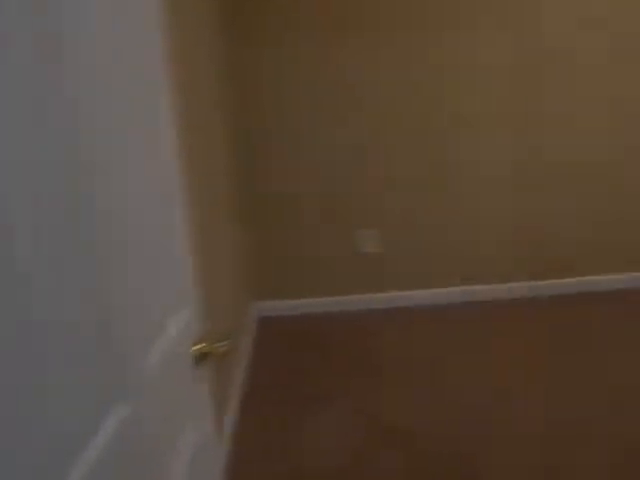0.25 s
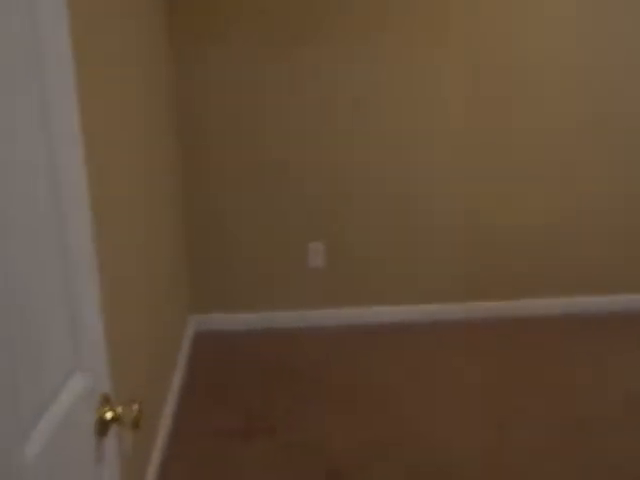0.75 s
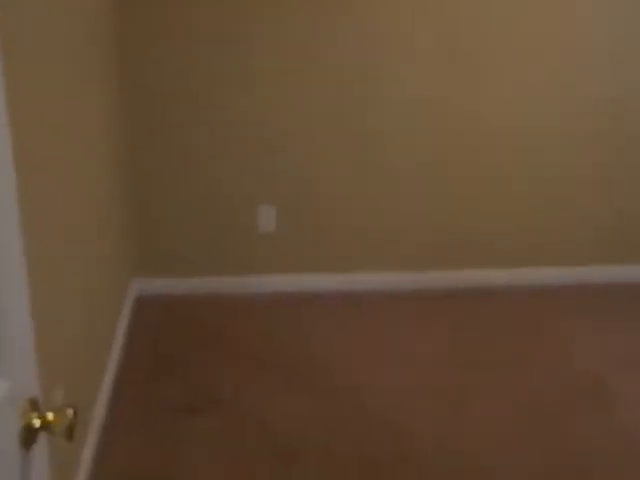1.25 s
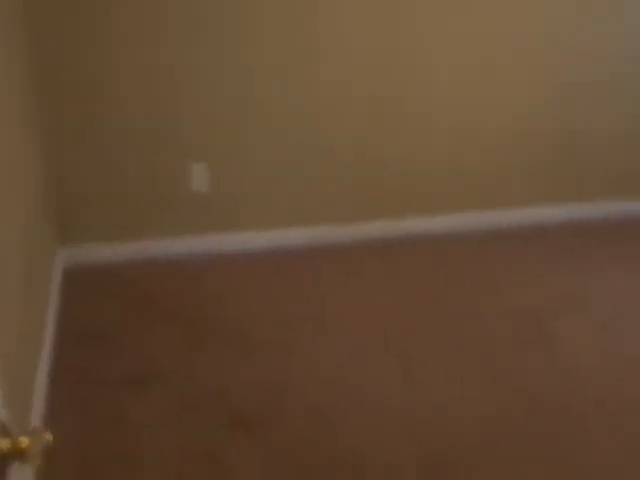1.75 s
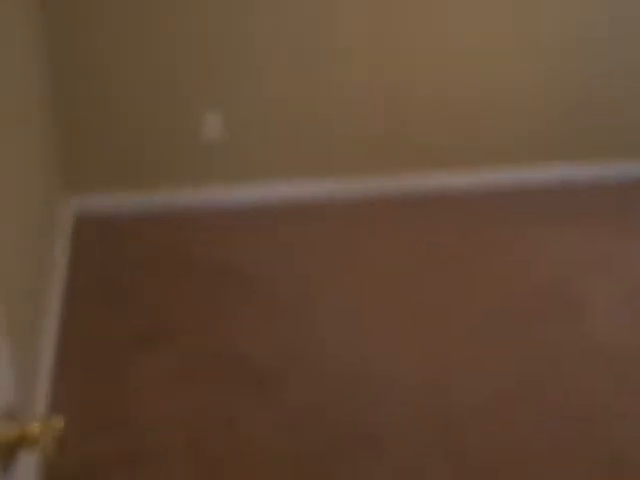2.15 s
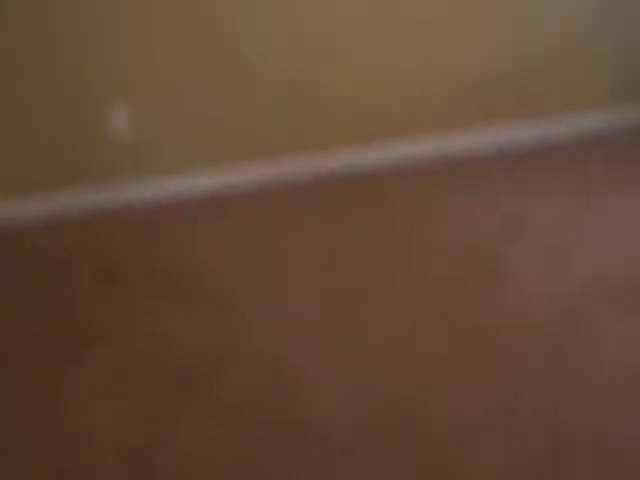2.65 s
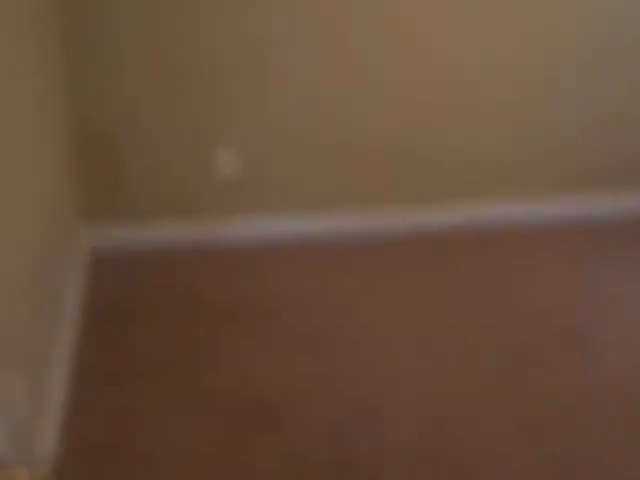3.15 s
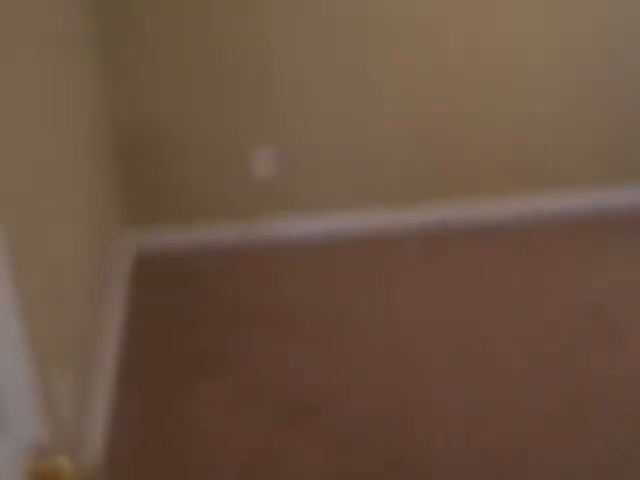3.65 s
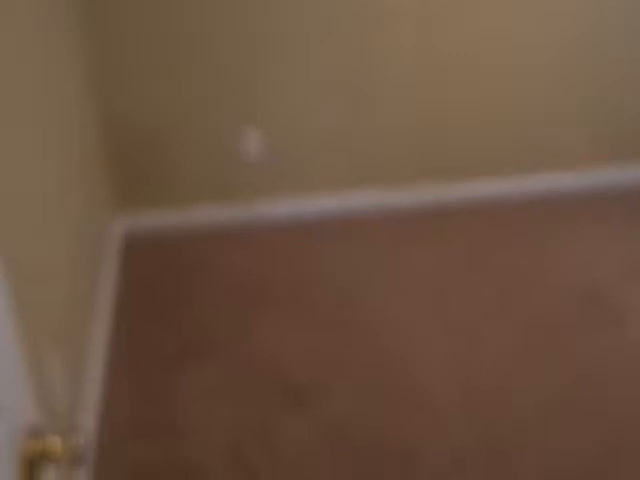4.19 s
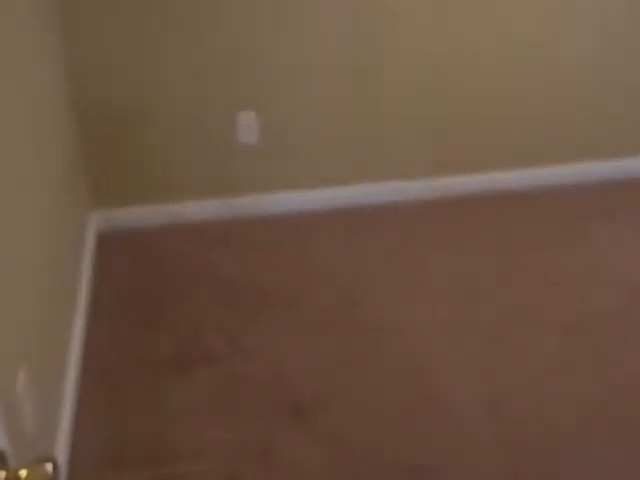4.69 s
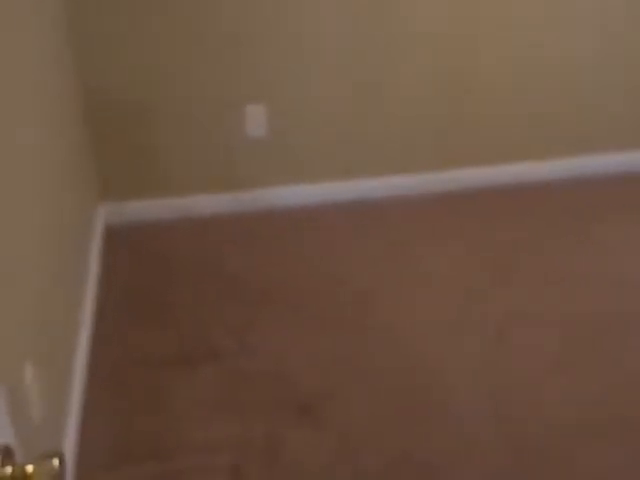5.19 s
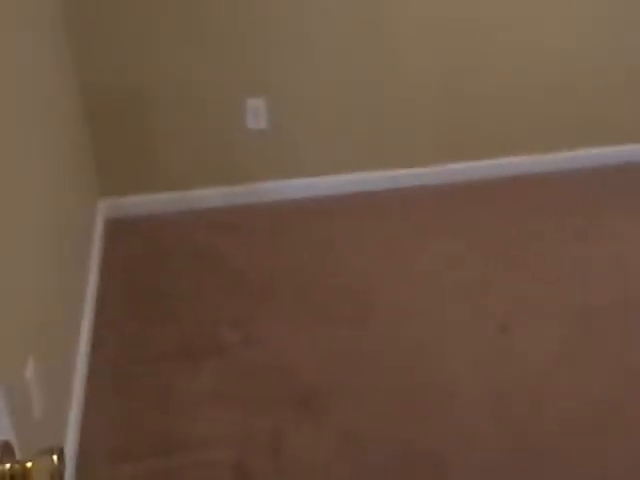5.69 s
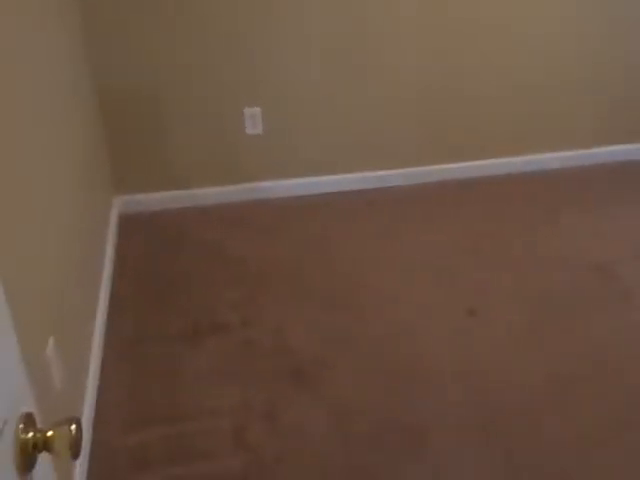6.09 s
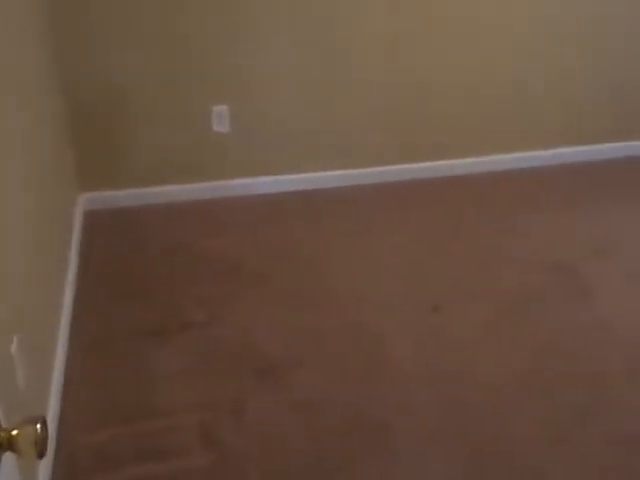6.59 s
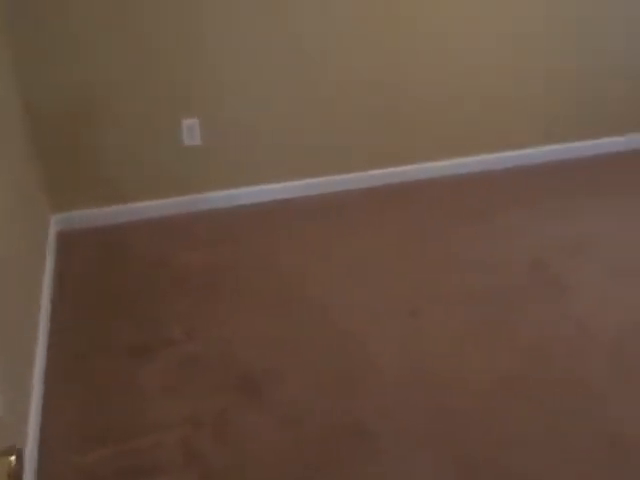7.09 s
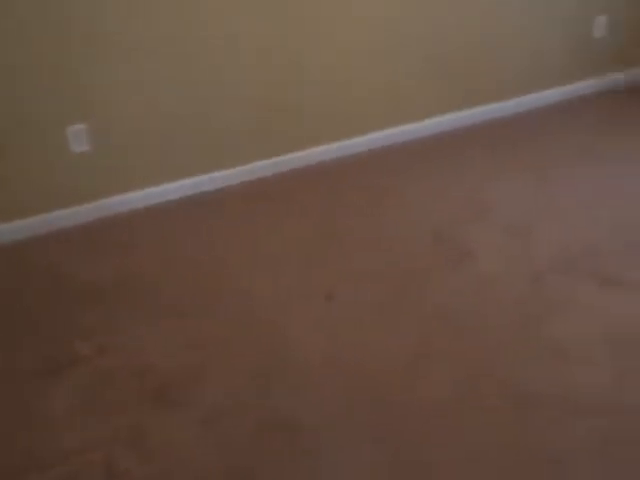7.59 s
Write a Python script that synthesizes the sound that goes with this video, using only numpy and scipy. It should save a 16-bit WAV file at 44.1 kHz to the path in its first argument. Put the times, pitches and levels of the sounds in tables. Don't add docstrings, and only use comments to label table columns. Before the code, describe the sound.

A hollow sole drag and muffled knock on carpet open the scene, followed by a strong low door thud with a short bare-room echo and a weaker rebound. Footsteps fade as the walker stops. Then crisp, dry finger clicks and small rubs on a plastic casing stand out very close, between faint grainy lens whirs; steady hiss and a thin high whine lie underneath.

```python
import sys
import numpy as np
from scipy import signal
from scipy.fft import rfft, irfft, next_fast_len
from scipy.io import wavfile
from scipy.ndimage import uniform_filter1d, map_coordinates

SR = 44100
rng = np.random.default_rng(int(sys.argv[2]) if len(sys.argv) > 2 else 0)


def wrap_up_sound(samples):
    columns = np.atleast_2d(samples).T
    tamed = np.clip(columns, -1, 1)
    steps = np.round(tamed * 32767).astype(np.int16)
    wavfile.write(sys.argv[1], SR, steps)


def level_to_linear(level):
    exponent = np.asarray(level, float) / 20
    return 10 ** exponent


N = 345636
T = np.arange(N) / SR

# centre_hz, width_hz, level_db
SHELL_MODES = [(2530, 3000, -2), (3630, 290, 8), (4440, 1880, 22), (6800, 840, -21), (9340, 2030, 14),
               (11550, 940, 10.5), (13700, 1300, -14.5)]


def unit(x):
    return x / np.sqrt(np.mean(x ** 2) + 1e-20)


def peak(x):
    return x / np.abs(x).max()


def filtered(x, response):
    m = next_fast_len(len(x) + 4096)
    return irfft(rfft(x, m) * response(np.fft.rfftfreq(m, 1 / SR)), m)[:len(x)]


def along(points, hz):
    f, v = np.transpose(points)
    return np.interp(np.log(hz + 1), np.log(f + 1), v)


def coloured(x, spectrum):
    return unit(filtered(x, lambda f: level_to_linear(along(spectrum, f))))


def modes(table):
    def response(f):
        total = 0
        for k, (centre, width, db) in enumerate(table):
            resonance = 1j * f * width / (centre * centre - f * f + 1j * f * width)
            total = total + (-1) ** k * level_to_linear(db) * resonance
        return total
    return response


def wobble(rate):
    return map_coordinates(rng.standard_normal(int(N * rate / SR) + 4), [T * rate])


def grains(rough_db, rate):
    return rng.standard_normal(N) * level_to_linear(rough_db * wobble(rate))


def add(track, s, sound):
    i = round(s * SR)
    track[i:i + len(sound)] += sound[:len(track) - i]


def decay(t, t60):
    return level_to_linear(-60 * t / t60)


def struck(t, hz, t60, rise_s):
    return np.sin(2 * np.pi * hz * t) * decay(t, t60) * (1 - np.exp(-t / rise_s))


def floor():
    # pitch_hz, level_db (per Hz)
    hiss_colour = [(22, -17), (55, -4), (302, -3.5), (381, -6), (457, -1.5), (507, -4.5), (831, -7),
                   (1330, -9.5), (1670, -8), (2060, -10), (14800, -14.5)]
    blip_times = [.504, 1.606, 1.641, 1.701, 1.741, 1.84, 1.906, 1.937, 2.005, 2.036, 2.07, 2.14, 2.172,
                  2.205, 2.27, 2.305, 3.642, 5.478, 5.508, 5.611, 7.508, 7.747]
    hiss = coloured(rng.standard_normal(N), hiss_colour)
    whine = unit(level_to_linear(2 * wobble(12)) * np.sin(2 * np.pi * 12290 * T + 1.5 * wobble(20)))
    gate = np.zeros(N)
    for s in blip_times:
        add(gate, s - .015, np.hanning(round(.03 * SR)) ** 2)
    blips = gate * np.sin(2 * np.pi * 8700 * T)
    return level_to_linear(-59) * hiss + level_to_linear(-76.5) * whine + level_to_linear(-64) * blips


def level(start, stop, start_db, stop_db):
    return level_to_linear(np.interp(T, [start - .025, start, stop, stop + 0.031], [-95, start_db, stop_db, -95]))


def motor():
    # start_s, stop_s, start_db, stop_db
    runs = [
        (3.82, 4.639, -50, -47.5),
        (5.663, 6.646, -48, -46.5),
        (6.787, 6.975, -46.5, -49.5),
    ]
    # pitch_hz, level_db (per Hz)
    barrels = [
        [(590, -52), (1000, -18), (1240, -8), (1890, -12.5), (2140, -3.5), (2500, -15), (3250, -6.5),
         (3720, 1.5), (4360, -5.5), (5600, 1), (6490, -5), (8420, -9), (11400, -13), (15000, -18.5)],
        [(1180, -37), (2000, -14), (2210, -15), (3180, -12.5), (3640, -2), (4340, -11.5), (4850, -1.5),
         (5360, 1.5), (6090, -5.5), (7510, -13), (9280, -11), (10400, -17.5), (13800, -21.5), (15000, -26)],
        [(880, -26), (1500, -5.5), (1720, -17), (2140, -10), (2860, -13), (3710, -10.5), (4950, -3.5),
         (7420, -9), (9360, -7.5), (10200, -16), (13800, -18.5), (15000, -24)],
    ]
    # centre_hz, width_hz, level_db
    ridge_sets = [
        [(1510, 170, -4.5), (6600, 250, -1), (7970, 180, -5), (9200, 300, -2), (11500, 480, -4),
         (13900, 400, -8)],
        [(6750, 140, -2), (8040, 320, -7), (9600, 160, -7), (10800, 250, -13), (11200, 400, -4),
         (13600, 270, -2)],
        [(3640, 230, 1), (5440, 670, -7), (8200, 300, -19), (8950, 190, -5), (10800, 330, 0), (13500, 420, -8)],
    ]
    teeth = [
        (0.05, 0.082, 0.37),
        (0.083, 0.23, 0.11),
        (0.13, 0.067, 0.19),
    ]
    shaft_hz = 35.5
    out = np.zeros(N)
    turn = 2 * np.pi * np.cumsum(shaft_hz * (1 + 0.011 * wobble(4.2))) / SR
    for run, barrel, ridges, depths in zip(runs, barrels, ridge_sets, teeth):
        mesh = 1 + sum(d * np.cos((k + 1) * turn + k) for k, d in enumerate(depths))
        rattle = mesh * grains(0.9, 300)
        whir = filtered(rattle, lambda f: level_to_linear(along(barrel, f)) * (0.58 + 0.98 * np.abs(modes(ridges)(f))))
        out += level(*run) * unit(whir)
    return out


def swells(rows, column=3):
    power = 0
    for row in rows:
        away = np.maximum((row[0] - T) / row[1], (T - row[0]) / row[2])
        power = power + level_to_linear(row[column] - 20 * away) ** 2
    return np.sqrt(power)


def scuffs():
    # peak_s, rise_s, fall_s,
    # carpet_db, clothes_db
    movements = [(0.0, 0.11, 0.93, -47.5, -69), (.24, 0.31, 0.22, -62, -58.5), (.62, 0.12, 0.56, -59, -61),
                 (1.32, 0.19, 0.83, -48, -74), (1.85, 0.44, 1.3, -60, -66), (2.42, 0.095, 1.7, -57, -78),
                 (2.645, 0.044, 0.53, -42, -59), (2.71, 0.226, 0.11, -53, -52.5), (2.82, 0.41, 1, -51, -55),
                 (3.06, 0.19, 0.22, -46, -59), (3.3, 0.34, 0.39, -61, -59)]
    # peak_s, rise_s, fall_s, level_db
    drags = [
        (.05, .06, 0.092, -50),
        (.222, 0.24, 0.11, -46.5),
        (.45, .5, 0.42, -58.5),
    ]
    # pitch_hz, level_db (per Hz)
    pile_colour = [(71, -40), (120, -12.5), (312, -1), (398, 1), (521, 1), (729, 2), (1430, -3),
                   (3000, -15), (3900, -30), (6600, -120)]
    # pitch_hz, level_db (per Hz)
    cloth_colour = [(1200, -16), (1800, 0), (2600, 1.5), (3500, -0.5), (5500, -3.5), (9000, -7.5),
                    (12000, -7), (15000, -18)]
    # centre_hz, width_hz, level_db
    sole_modes = [(1540, 220, 1.5), (2350, 340, -10), (3170, 450, -2.5), (4120, 340, -10)]
    body = coloured(grains(2.13, 45), pile_colour)
    brush = coloured(grains(1.8, 70), cloth_colour)
    rasp = unit(filtered(grains(1.5, 92.6), modes(sole_modes)))
    pile = np.hypot(swells(movements), level_to_linear(-59))
    cloth = swells(movements, column=4)
    return level_to_linear(-4.5) * pile * body + level_to_linear(1.5) * cloth * brush + level_to_linear(-2.0) * swells(drags) * rasp


def room(x):
    # pitch_hz, t60_s
    wall_decay = [(150, 0.56), (500, 0.6), (1400, 0.61), (3000, 0.62), (8000, 0.46)]
    hz, t, z = signal.stft(rng.standard_normal(SR // 2 + SR // 4), SR, nperseg=256)
    fade = decay(t, along(wall_decay, hz)[:, None])
    tail = signal.istft(z * fade, SR, nperseg=256)[1]
    t = np.arange(len(tail)) / SR
    tail = tail * (1 + 4 * decay(t, 0.1)) * (t > .008)
    return signal.fftconvolve(x, tail / np.linalg.norm(tail))


def knocks(table, panel, ratio, ring, rough, body_db, soft_hz, deep_hz, wet_db):
    out, t = np.zeros(N), np.arange(SR // 20) / SR
    edge_modes = modes([(2380, 980, 3.0), (3480, 1800, -1.5), (4800, 960, -3.5)])
    for s, db, low_hz, high_db, edge_db in table:
        high_hz = ratio * low_hz
        contact = decay(t, 3 * ring) * (1 - np.exp(-t / 0.0015))
        scrape, grit = rng.standard_normal((2, len(t))) * contact
        low = peak(struck(t, low_hz, 1.8 * ring, 0.00073))
        high = peak(-struck(t, high_hz, ring, .0007))
        low = low + rough * peak(filtered(scrape, modes([(low_hz, 0.61 * low_hz, 0)])))
        high = high + rough * peak(filtered(scrape, modes([(high_hz, 0.49 * high_hz, 0)])))
        edge = filtered(rng.standard_normal(len(t)) * decay(t, 0.034), edge_modes)
        dull = low + level_to_linear(high_db) * high + level_to_linear(body_db) * peak(filtered(grit, modes(panel)))
        dull = filtered(dull, lambda f: (1 + 1j * f / soft_hz) ** -4)
        blow = level_to_linear(db) * (peak(dull) + level_to_linear(edge_db) * peak(edge))
        add(out, s, blow)
        add(out, s, level_to_linear(wet_db) * room(blow))
    return filtered(out, lambda f: (1j * f / (1j * f + deep_hz)) ** 4)


def door():
    # start_s, peak_db, low_mode_hz, high_mode_db, edge_db
    blows = [
        (1.1612, 0, 426, -3, -37),
        (1.2185, -16.5, 260, 23, -9.5),
    ]
    # centre_hz, width_hz, level_db
    door_modes = [(401, 150, -1), (570, 140, 2), (770, 230, -0.5), (1040, 71, -14), (1560, 230, 6.5)]
    return knocks(blows, door_modes, ratio=3.01, ring=0.0065, rough=0.43, body_db=-2.5,
                  soft_hz=2220, deep_hz=184, wet_db=-3.5)


def steps():
    # start_s, peak_db, low_mode_hz, high_mode_db, edge_db
    blows = [
        (.0135, -19.5, 562, 14, -25),
        (.567, -25.5, 475, 20, -13.5),
        (.597, -32, 387, -5, -13),
        (.825, -39.5, 550, 9, -6),
        (.881, -41, 910, 18, 1.5),
        (1.895, -38, 381, -22, -35),
        (1.956, -36, 590, 3, -26),
        (2.01, -46, 523, 5, -3),
    ]
    # centre_hz, width_hz, level_db
    board_modes = [(199, 120, -6), (452, 190, -15.5), (700, 180, 11), (1050, 220, -5), (1630, 340, -20)]
    return knocks(blows, board_modes, ratio=2.03, ring=0.016, rough=1.14, body_db=-0.5,
                  soft_hz=4340, deep_hz=80, wet_db=-7.0)


def rubs():
    # start_s, rise_s, length_s, level_db, brightness_db
    strokes = [(0.297, 0.0087, .033, -67, 12), (0.821, 0.0021, 0.05, -50.5, -3),
               (3.065, .003, .04, -65, 29), (3.106, .004, 0.17, -54.5, 5), (3.281, 0.0012, 0.047, -60, -26),
               (3.297, 0.036, 0.028, -54, -5), (3.339, .012, 0.027, -56, 14),
               (3.364, 0.012, 0.092, -46.5, -2), (3.558, 0.027, .045, -67, 6),
               (4.886, .003, 0.11, -58.5, -4), (5.043, 0.026, 0.13, -56, 1), (5.33, 0.0054, 0.076, -57, -6),
               (5.642, 0.01, 0.031, -53.5, -19), (6.253, 0.013, 0.025, -36, -0.5),
               (6.761, 0.018, .02, -56, -12), (7.04, 0.0092, 0.12, -62, 3), (7.138, 0.044, .33, -62.5, 4)]
    hold = 0.14
    upper, middle = np.zeros(N), np.zeros(N)
    for s, rise, length, db, bright_db in strokes:
        corners = np.cumsum([s, rise, hold * length, (1 - hold) * length])
        stroke = np.interp(T, corners, [0, 1, 1, 0]) ** 1.37
        upper += level_to_linear(db + bright_db / 2) * stroke
        middle += level_to_linear(db - bright_db / 2) * stroke
    skin = grains(1.6, 500)
    upper_skin = unit(filtered(skin, modes(SHELL_MODES[3:])))
    middle_skin = unit(filtered(skin, modes(SHELL_MODES[:3])))
    return upper * upper_skin + middle * middle_skin


def snap(t):
    shape = (t / 0.00071) ** 2 * np.exp(-t / 0.00052) + 0.015 * decay(t, 0.091)
    x = 0.56 * rng.standard_normal(len(t)) * shape
    x[40] += .9
    return x


def clicks():
    # start_s, peak_db, middle_db, top_db
    snaps = [(0.7602, -51.5, 5, -8), (2.4503, -45, -17, -6), (3.0704, -25.5, -10.5, -3),
             (3.1486, -17, -4.5, -2), (3.2565, -34, -17, -2), (3.2829, -40, -6, -20), (3.296, -39, 4, -23),
             (3.3692, -6.5, -14, -33), (3.5019, -15, -10, -14), (3.5951, -30, -19, -9),
             (4.0342, -21.5, -18.5, -14), (4.05, -39, 1, -19), (4.133, -38, -4, -22), (4.169, -40, -1, -22),
             (4.548, -42.5, 1, -22), (4.587, -13, -14.5, -8), (4.629, -33.5, -7, -23),
             (4.8883, -42.5, -6, 4), (5.227, -44, -18, -4), (5.3466, -15.5, -12, 0),
             (5.658, -27, -4.5, -23), (5.718, -21.5, -5.5, -5), (5.7496, -43, 4, -12),
             (5.8192, -43, -6, -13), (6.258, -25, -13, -15), (6.2743, -30, -20, -23),
             (6.2824, -25, -17, -16), (6.7854, -32.5, -5.5, -22), (6.8537, -27, -12.5, -4)]
    # start_s, peak_db, pitch_hz
    thumps = [(0.7604, -51, 680), (2.4503, -50, 1130), (2.766, -37.5, 795), (2.789, -42, 700),
              (3.0705, -50, 583), (3.1486, -57, 1110), (3.2565, -57, 452), (3.2833, -36.5, 520),
              (3.287, -38, 1010), (3.2959, -36, 905), (3.5039, -34, 880), (4.0349, -28, 630),
              (4.0492, -44, 1150), (4.8883, -49, 662), (5.3486, -32.5, 1010), (5.7182, -51, 452),
              (5.7485, -45.5, 1120), (6.257, -33, 1080), (6.2745, -40.5, 1100), (6.2825, -38, 620),
              (6.8535, -49, 600)]
    out, t = np.zeros(N), np.arange(SR // 25) / SR
    for s, db, middle_db, top_db in snaps:
        x = snap(t)
        top = peak(filtered(x, modes(SHELL_MODES[5:])))
        upper = peak(filtered(x, modes(SHELL_MODES[3:5])))
        middle = peak(filtered(x, modes(SHELL_MODES[:3])))
        click = filtered(upper, lambda f: 1 / (1 + (f / 12500) ** 8))
        click = click + level_to_linear(top_db - 6.5) * top + level_to_linear(middle_db + 8.5) * middle
        add(out, s, level_to_linear(db + 0.5) * click)
    for s, db, thump_hz in thumps:
        thump = -struck(t, thump_hz, 6.5 / thump_hz, 0.0005)
        touch = filtered(snap(t), modes([(1920, 600, 2), (550, 310, 8)]))
        add(out, s, level_to_linear(db) * (peak(thump) + level_to_linear(-5.5) * peak(touch)))
    jolt = np.sin(2 * np.pi * 105 * t) * (t < 1 / 105)
    add(out, 3.1465, level_to_linear(-46.5) * jolt)
    return out


def scene():
    mono = floor() + motor() + scuffs() + door() + steps() + rubs() + clicks()
    return np.array([mono, mono])


def band_limit(x):
    return signal.sosfilt(signal.butter(12, 16340, fs=SR, output="sos"), x)


def record(dry):
    mono, top_hz = dry[0], 15000
    low = filtered(mono, lambda f: f < top_hz)
    top = filtered(mono, lambda f: f < top_hz + 1150) - low
    attack = uniform_filter1d(np.abs(top), size=64) > level_to_linear(-60)
    mono = low + level_to_linear(-10) * top * attack
    mono = mono - .0006
    z = signal.stft(mono, nperseg=1024)[2]
    frames = np.repeat(rng.random(z.shape[1]) < .2, 2)[:z.shape[1]]
    bands = np.repeat(rng.random(z.shape) < .6, 24, axis=0)[:z.shape[0]]
    error = np.minimum(np.abs(z), level_to_linear(-57)) * np.exp(2j * np.pi * rng.random(z.shape))
    side = level_to_linear(-17) * signal.istft(error * frames * bands, nperseg=1024)[1][:N]
    return band_limit(np.array([mono + side, mono - side]))


dry = scene()
out = record(dry)
wrap_up_sound(out)
```